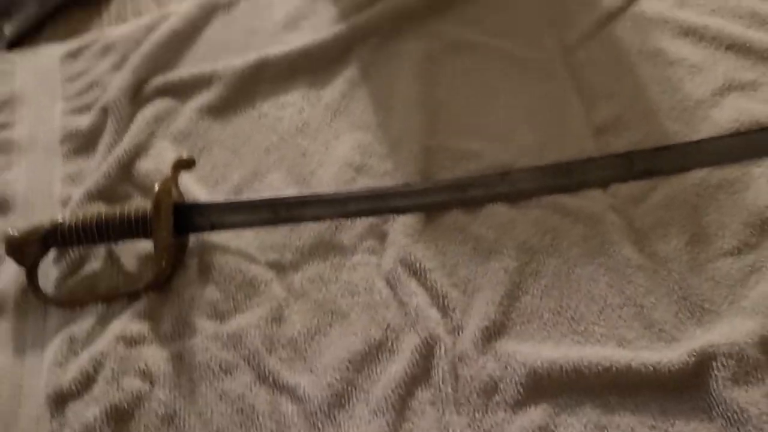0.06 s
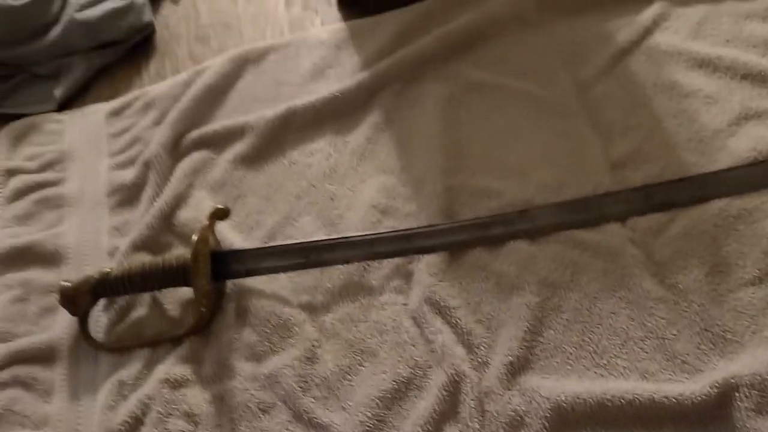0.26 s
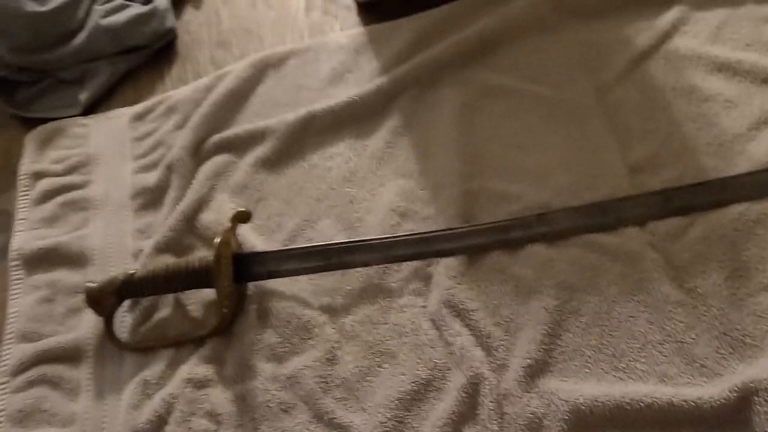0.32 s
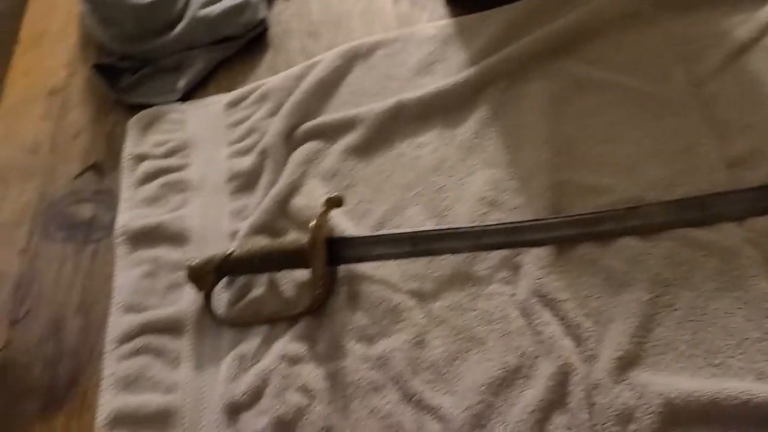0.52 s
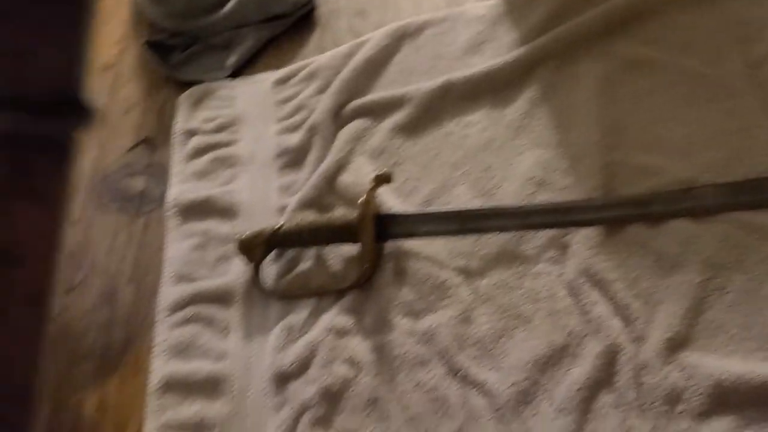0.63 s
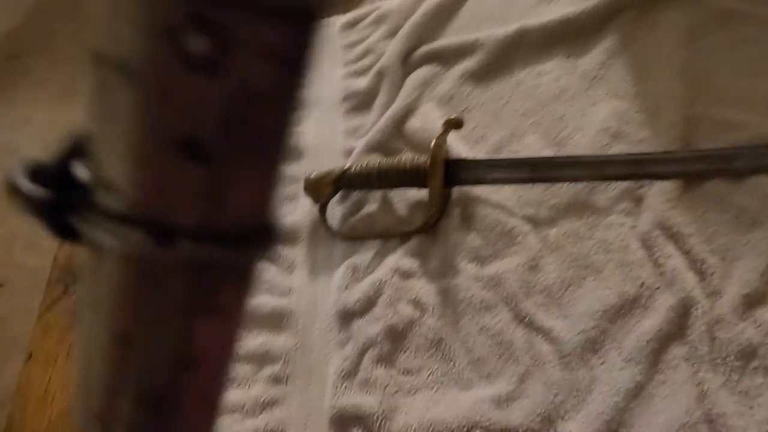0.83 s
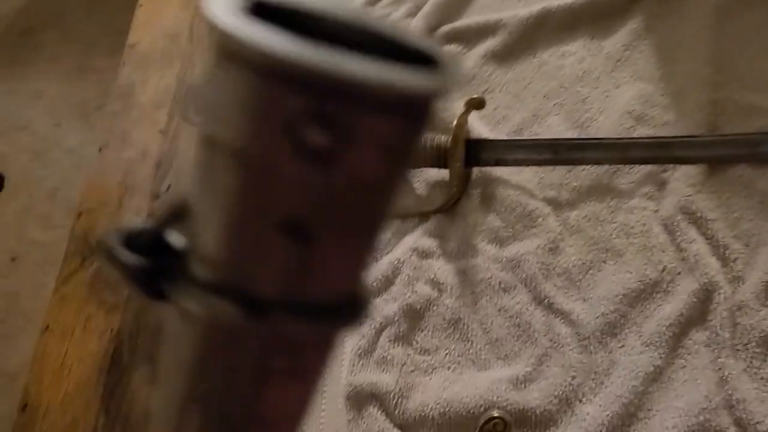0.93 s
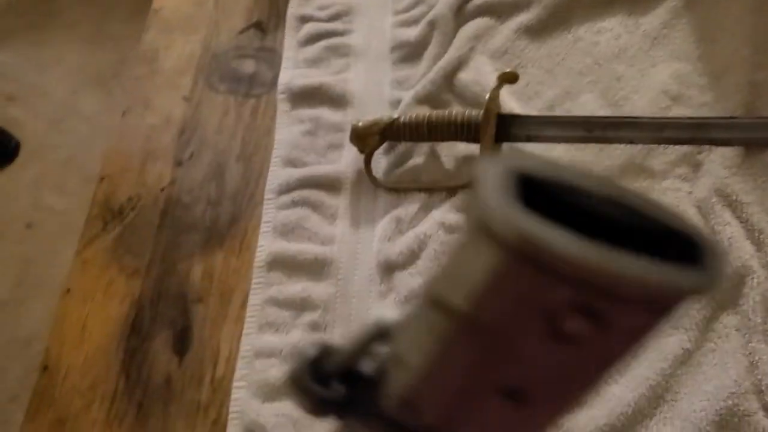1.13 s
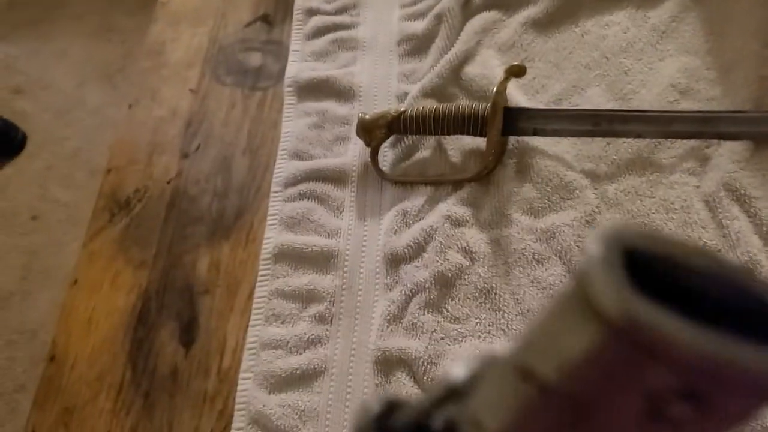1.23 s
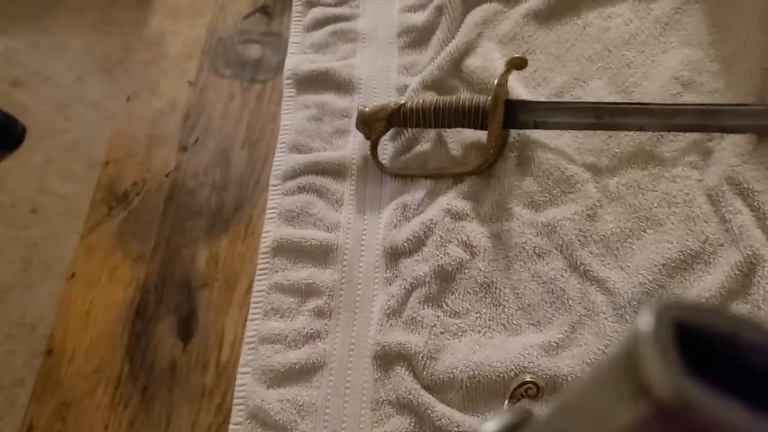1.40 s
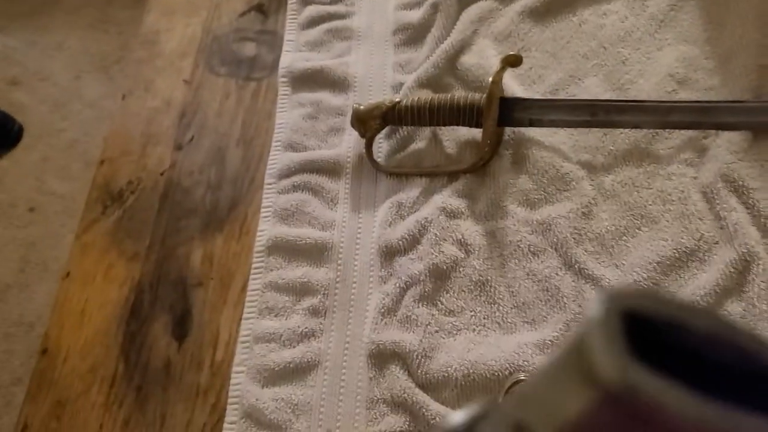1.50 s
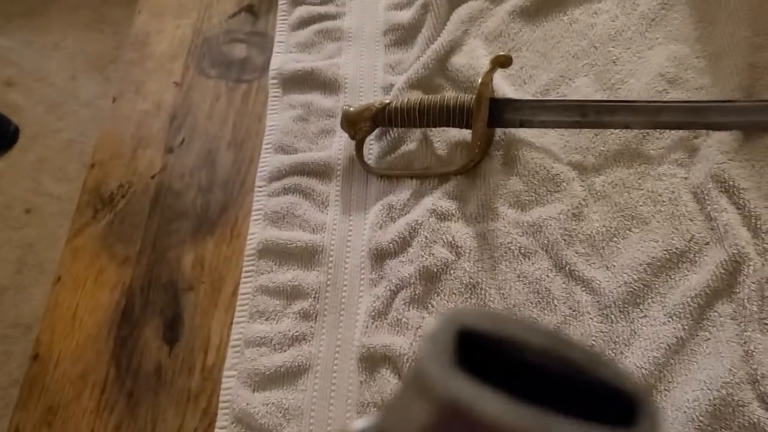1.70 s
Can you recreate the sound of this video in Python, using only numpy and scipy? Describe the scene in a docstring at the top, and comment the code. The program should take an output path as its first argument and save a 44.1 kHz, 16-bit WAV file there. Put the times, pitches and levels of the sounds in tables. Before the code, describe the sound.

One close metallic clink of a loose ring against a steel scabbard, over a faint hum.

```python
"""Scabbard ring clink

A steel scabbard is moved close by in a small, quiet room. Its loose carrying ring slides, taps
once, then clinks hard against the mount, ringing the fittings and the hollow tube. A thin squeak
follows as the scabbard turns, with a soft knock of the hand. An appliance hums in the background."""
import sys
import numpy as np
from scipy import signal
from scipy.fft import rfft, irfft
from scipy.io import wavfile

SR = 44100
rng = np.random.default_rng(int(sys.argv[2]) if len(sys.argv) > 2 else 0)


def generate_wav(sig):
    """Save sig (samples, or channels by samples) to the path in sys.argv[1] as 16-bit PCM at SR."""
    pcm = np.round(np.clip(np.atleast_2d(sig).T, -1, 1) * 32767).astype(np.int16)
    wavfile.write(sys.argv[1], SR, pcm)


N = 77175

# spectrum of the tube's crowded modes: f/Hz, relative level/dB
TUBE_SPECTRUM = [(500, -49.5), (1000, -34.5), (1380, -17.5), (1620, -30.5), (2000, -6.5), (2900, -15),
                 (4000, 2.5), (5200, -6.5), (6600, 7.5), (7400, -3.5), (8300, -14), (10500, -6.5),
                 (13000, -17.5), (15000, -9.5), (17000, -18.5)]
TUBE_T60_S = 0.054


def clink():
    """The ring strikes the mount: each contact cracks on the tube and sets the fittings ringing."""
    # t/s, level/dB, fittings level/dB, low-pass f/Hz, high-pass f/Hz, tube left minus right/dB
    contacts = [(0.2254, -6.5, -4.5, 10500, 4500, 1.5), (0.2399, 0.5, -2.5, 15500, 1194, 2),
                (0.243, -2.5, -16, 13000, 1500, 2)]
    attack_s = 0.00041
    out, overtones = 0, steel_overtones()
    for start, db, fittings_db, top_hz, low_hz, side_db in contacts:
        age = clock() - start
        ringing = undb(fittings_db) * (fittings(age) + shimmer(age, overtones))
        blow = (ringing + tube_crack(age) * pan(side_db)) * ramp(age, attack_s)
        dulled = cut(blow, top_hz, "low", order=8)
        out = out + undb(db) * cut(dulled, low_hz, "high", order=1)
    return out


def fittings(age):
    """Ring and mount sound their inharmonic modes, a quarter cycle apart in left and right."""
    # f/Hz, level/dB, t60/s, left minus right/dB
    modes = [(702, -29, .35, 3), (1232, -23, .14, -1), (1405, -20, .18, 0), (2250, -13, .16, -1),
             (2476, -25, .3, -3), (2909, -22, .3, -1), (3198, 0, .19, -1), (3560, -6, .17, -3),
             (3721, -8, .26, -2), (3966, 1, .11, 1), (4074, -7, .12, 3), (4319, -7, .11, 6),
             (4669, -5, .12, 6), (4985, -11, .17, 0), (5776, -10, .14, -4), (6159, -6, .21, 5),
             (6545, -7, .12, 4), (6860, -8, .18, 4)]
    phase = np.array([[0], [np.pi / 2]])
    return undb(-15) * sum(undb(db) * pan(side_db) * fade(age, t60) * np.sin(2 * np.pi * hz * age + phase)
                           for hz, db, t60, side_db in modes)


def tube_crack(age, level_db=-9.5):
    """The thin steel tube cracks: close, quickly damped modes blur into a burst of noise."""
    return undb(level_db) * noise(undb(by_hz(TUBE_SPECTRUM, bins()))) * fade(age, TUBE_T60_S)


def steel_overtones(count=120):
    """The steel's faint, irregular overtones: rows of f/Hz, t60/s, stereo gains, stereo phases."""
    # f/Hz, relative level/dB, t60/s
    contour = [(1790, -17, .15), (2300, -12, .15), (2950, -21, .15), (3800, -5, .15), (5219, -5, 0.14),
               (6275, -6.5, .17), (8095, -8.5, .19), (10870, -5, 0.19), (13000, -15.5, .14),
               (15480, -7.5, .1)]
    level_db, scatter_db = -23, 5
    low_hz, top_hz = contour[0][0], contour[-1][0]
    hz = low_hz + (top_hz - low_hz) * (np.arange(count) + rng.random(count)) / count
    gains = undb(by_hz(contour, hz)[:, None] + scatter_db * rng.standard_normal((count, 2)))
    rms = np.sqrt(np.sum(gains ** 2) / 4)
    phases = rng.uniform(0, 2 * np.pi, (count, 2))
    return list(zip(hz, by_hz(contour, hz, column=2), undb(level_db) * gains / rms, phases))


def shimmer(age, overtones):
    """The struck steel's overtones ring together as a bright, short sheen."""
    out, live = np.zeros((2, N)), (age >= 0) & (age < 1 / 3)
    for hz, t60, gain, phase in overtones:
        tone = np.sin(2 * np.pi * hz * age[live] + phase[:, None])
        out[:, live] += gain[:, None] * fade(age[live], t60) * tone
    return out


def ring_slide():
    """The ring creeps, then slips in its eye: tiny dense catches excite one ring mode and the tube."""
    creep_s, slip_s, end_s = .125, .201, .221
    catches_per_s, mode_hz = 5000, 3198
    t = clock()
    force = (ramp(t - slip_s, rise_s=.005) + undb(-33) * (t > creep_s)) * (t < end_s)
    catches = rng.standard_normal(N) * (rng.random(N) < catches_per_s / SR) * force
    body = fade(t, t60=.06) * np.sin(2 * np.pi * mode_hz * t) + tube_crack(t, level_db=-6.5)
    scrape = signal.fftconvolve(catches[None], body, axes=1)[:, :N]
    scrape = cut(scrape, hz=5960, kind="low", order=1)
    slip_rms = np.std(scrape[:, (t > slip_s) & (t < end_s)])
    return undb(-46.5) * scrape / slip_rms


def squeak():
    """The turning scabbard squeaks, thin and rough: a narrow band of noise in a few swells."""
    # t/s, width/s, level/dB
    swells = [(.895, .014, -72), (.938, .012, -66.5), (.988, .011, -63.5), (1.033, 0.014, -65),
              (1.085, 0.031, -71.5)]
    centre_hz, width_hz = 4475, 75
    envelope = sum(undb(db) * np.exp(-.5 * ((clock() - at) / width) ** 2) for at, width, db in swells)
    return envelope * noise(np.exp(-.5 * ((bins() - centre_hz) / width_hz) ** 2))


def hand_knock(start_s=.997):
    """The hand bumps the scabbard with a faint, dull thud."""
    # f/Hz, relative level/dB
    spectrum = [(50, -2), (120, -2), (300, -8), (800, -32), (2600, -33), (3500, -48), (10000, -70)]
    age = clock() - start_s
    thud = noise(undb(by_hz(spectrum, bins())), channels=1)
    return undb(-43.5) * thud * fade(age, t60=.07) * ramp(age, rise_s=.003)


def small_room(direct):
    """Diffuse reflections build up just behind the direct sound; the treble dies first."""
    # f/Hz, reflection level/dB, t60/s
    bands = [(700, -3.5, .3), (1613.5, -9.5, .24), (4000, -12.5, .22), (6600, -13, 0.19),
             (10000, -10, 0.098), (15000, -12, .15)]
    predelay_s, build_s = 0.012, 0.007
    t, centres_hz = clock(), np.array(bands)[:, 0]
    white = rfft(rng.standard_normal((2, N)))
    response = 0
    for weights, (_, db, t60) in zip(np.eye(len(bands)), bands):
        reflections = irfft(white * np.interp(bins(), centres_hz, weights), N)
        envelope = fade(t, t60) * ramp(t - predelay_s, build_s)
        response = response + undb(db) * reflections * envelope / np.linalg.norm(envelope)
    return direct + signal.fftconvolve(direct, response, axes=1)[:, :N]


def room_tone():
    """A low bed of air, near mono in the upper bass and wide in the treble."""
    # f/Hz, relative level/dB
    spectrum = [(15, -30), (25, -25.5), (55, -11.5), (100, -5), (145, -8.5), (185, -9.5), (270, -7.5),
                (363, -10.5), (520, -16), (700, -25.5), (988, -33), (1400, -32.5), (2500, -40),
                (3920, -43.5), (5200, -50.5), (6740, -44), (8140, -66), (13000, -56), (16000, -60.5)]
    # stereo width: f/Hz, side minus mid/dB
    width = [(15, -2), (30, -4.5), (70, -15.5), (150, -14), (300, -13.5), (600, -4.5), (1500, 1.5),
             (16000, -2)]
    mid, side = noise(undb(by_hz(spectrum, bins())))
    side = irfft(rfft(side) * undb(by_hz(width, bins())), N)
    return undb(-51) * np.array([mid + side, mid - side])


def appliance_hum(waver_db=-0.5, waver_hz=5):
    """An appliance hums on three low tones, each wavering slightly in level."""
    # f/Hz, rms level/dB
    tones = [(120, -52.5), (274, -60), (355, -65.5)]
    wavers = noise(np.exp(-bins() / waver_hz), channels=len(tones))
    hum = 0
    for (hz, db), waver in zip(tones, wavers):
        tone = np.sqrt(2) * np.sin(2 * np.pi * (hz * clock() + rng.random()))
        hum = hum + undb(db + waver_db * waver) * tone
    return hum


def undb(db):
    """Decibels to gain."""
    return 10 ** (np.asarray(db) / 20)


def clock():
    """Time of each sample in seconds."""
    return np.arange(N) / SR


def bins():
    """Frequency of each spectral bin in Hz."""
    return np.fft.rfftfreq(N, 1 / SR)


def by_hz(table, hz, column=1):
    """Read one column of a table on a log-frequency axis."""
    rows = np.array(table, float)
    return np.interp(np.log(np.maximum(hz, 1)), np.log(rows[:, 0]), rows[:, column])


def noise(gain, channels=2):
    """Independent noises, coloured by a gain per bin, at an overall rms of 1."""
    x = irfft(rfft(rng.standard_normal((channels, N))) * gain, N)
    return x / np.std(x)


def pan(db):
    """Left and right gains for a level difference."""
    return undb(np.array([[db], [-db]]) / 2)


def ramp(age, rise_s):
    """Linear attack from age 0."""
    return np.clip(age / rise_s, 0, 1)


def fade(age, t60):
    """Exponential decay from age 0, falling 60 dB in t60 seconds."""
    return (age >= 0) * np.exp(-np.log(1000) * np.maximum(age, 0) / t60)


def cut(x, hz, kind, order):
    """Butterworth low-pass or high-pass."""
    return signal.sosfilt(signal.butter(order, hz, kind, fs=SR, output="sos"), x)


def scene():
    """The clink with its reflections and the dry handling sounds, over air and hum."""
    bed = room_tone() + appliance_hum()
    return bed + small_room(clink()) + ring_slide() + squeak() + hand_knock()


def record(dry):
    """A soft clip rounds the highest peaks and a steep low-pass trims the top."""
    ceiling, top_hz = .92, 16000
    rounded = dry / (1 + (dry / ceiling) ** 6) ** (1 / 6)
    return signal.sosfilt(signal.ellip(8, .2, 80, top_hz, fs=SR, output="sos"), rounded)


dry = scene()
out = record(dry)
generate_wav(out)
```